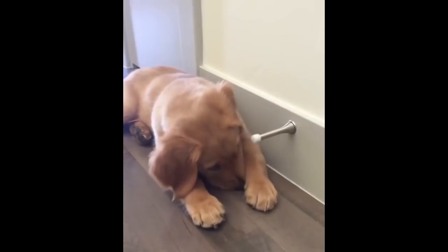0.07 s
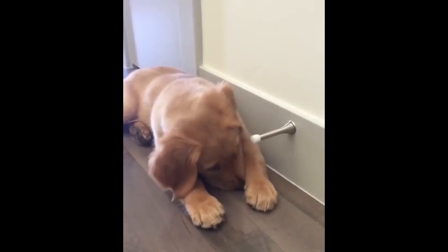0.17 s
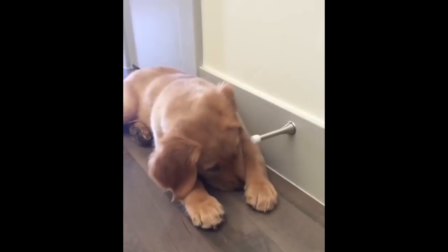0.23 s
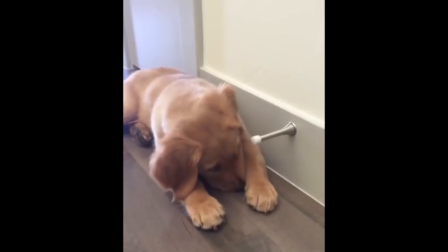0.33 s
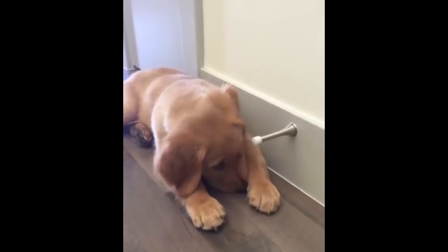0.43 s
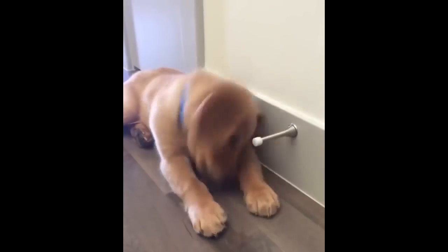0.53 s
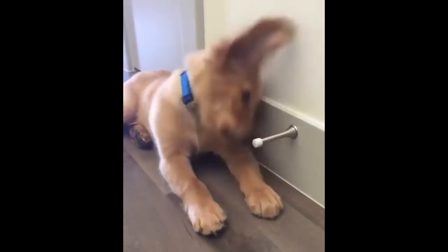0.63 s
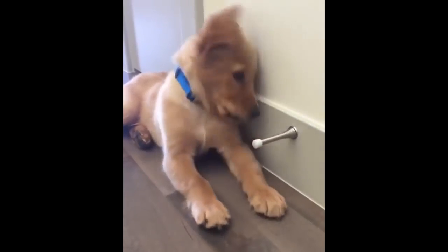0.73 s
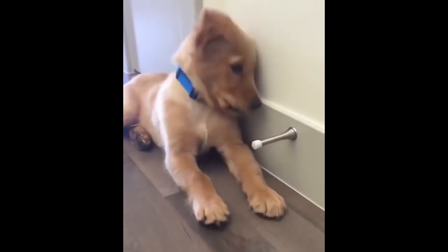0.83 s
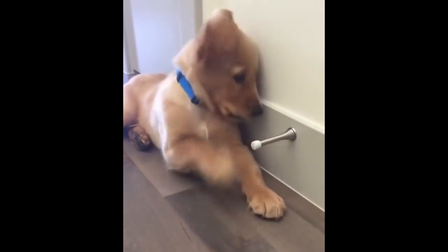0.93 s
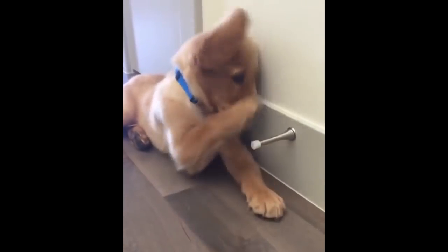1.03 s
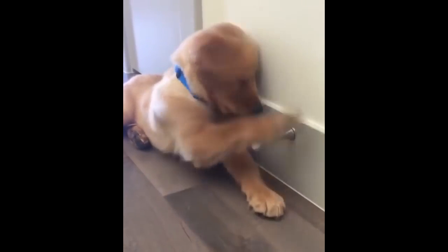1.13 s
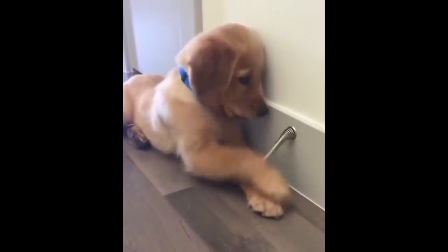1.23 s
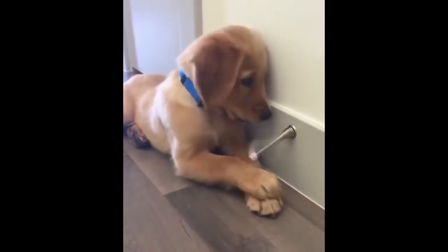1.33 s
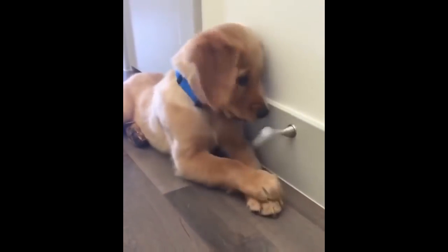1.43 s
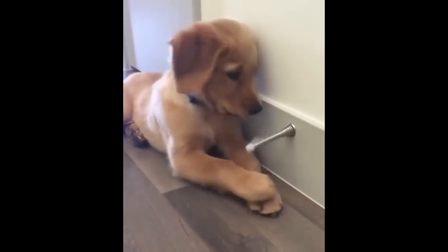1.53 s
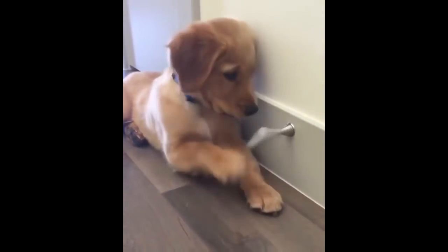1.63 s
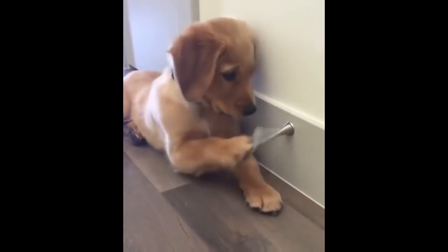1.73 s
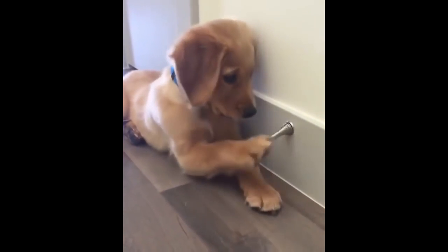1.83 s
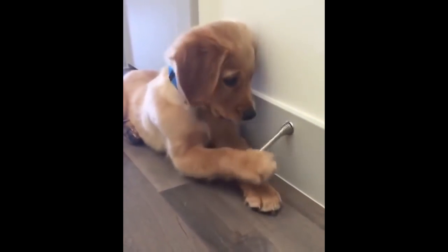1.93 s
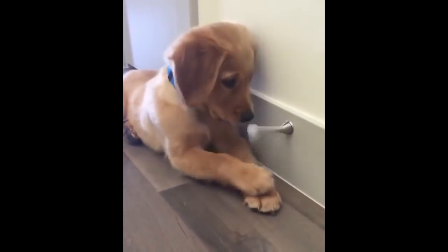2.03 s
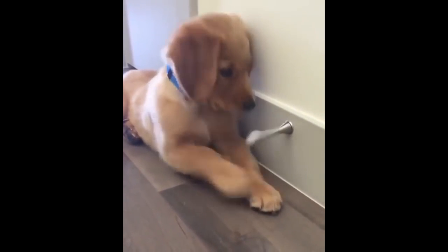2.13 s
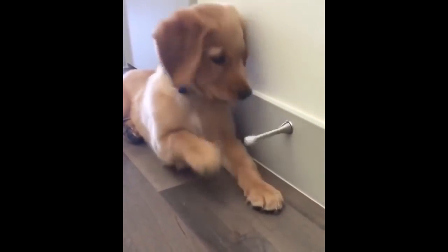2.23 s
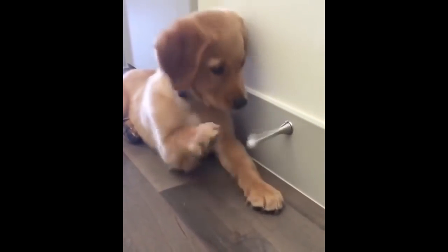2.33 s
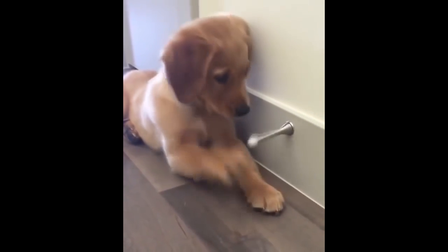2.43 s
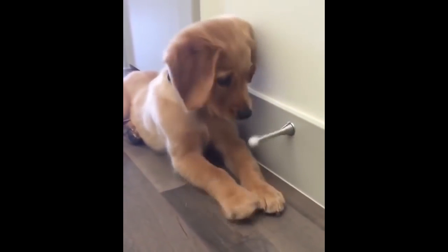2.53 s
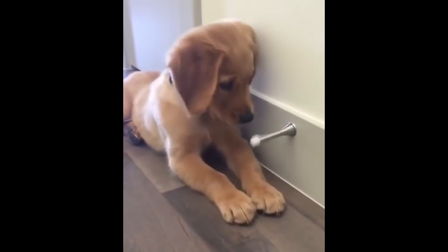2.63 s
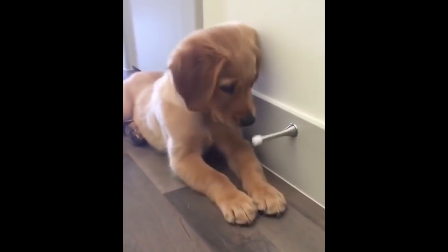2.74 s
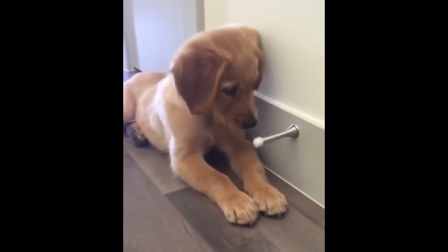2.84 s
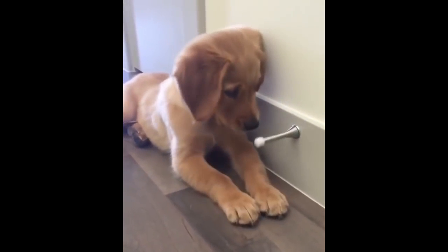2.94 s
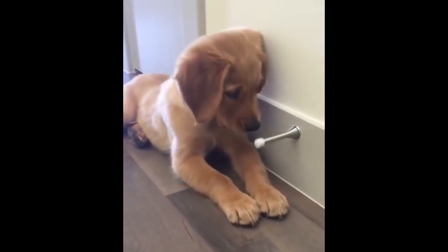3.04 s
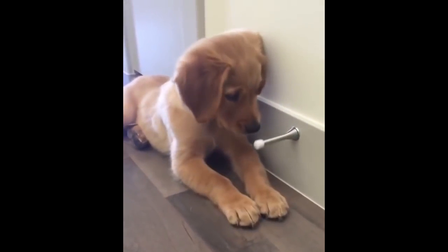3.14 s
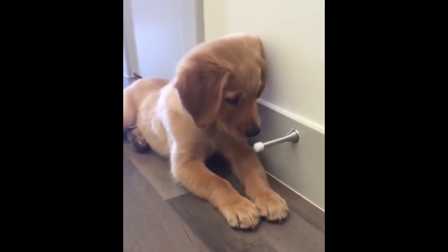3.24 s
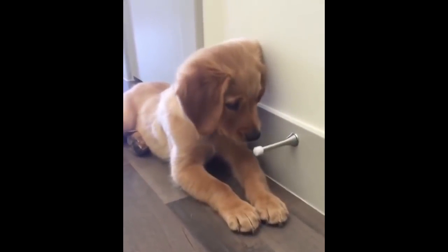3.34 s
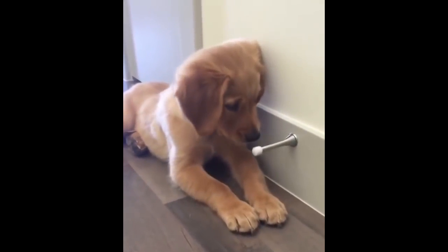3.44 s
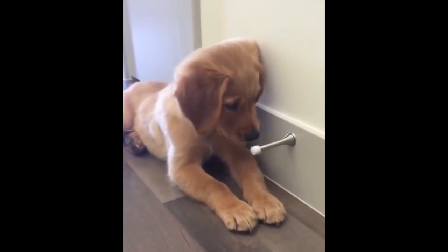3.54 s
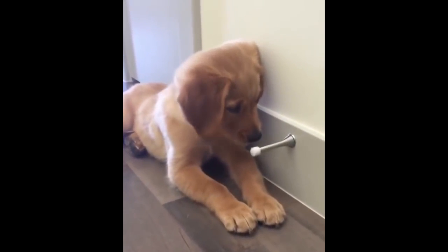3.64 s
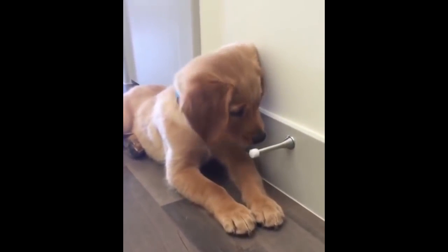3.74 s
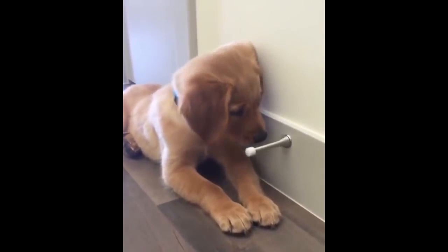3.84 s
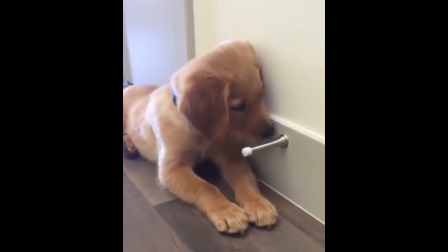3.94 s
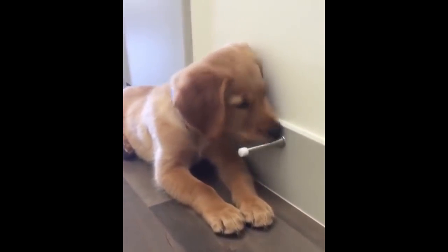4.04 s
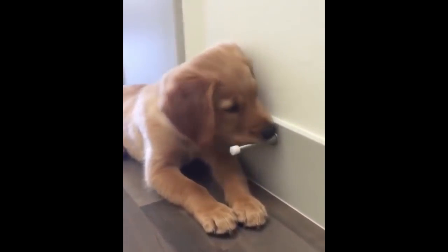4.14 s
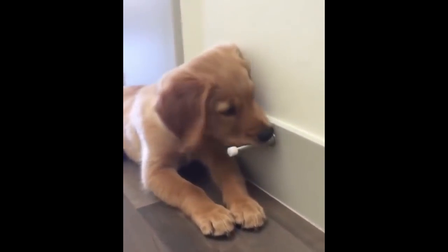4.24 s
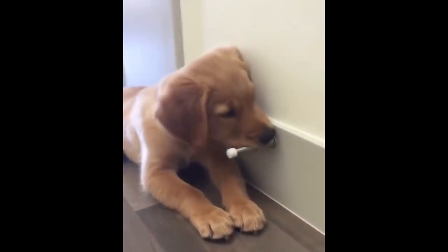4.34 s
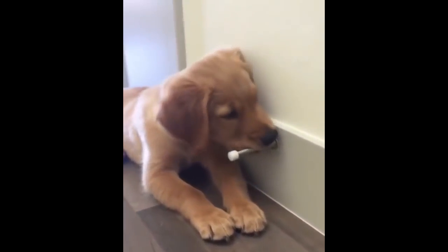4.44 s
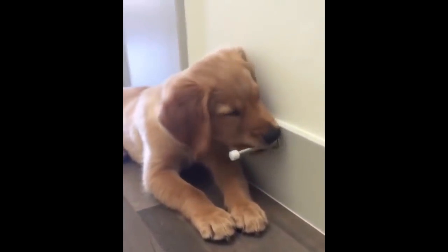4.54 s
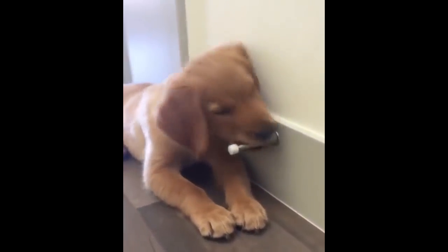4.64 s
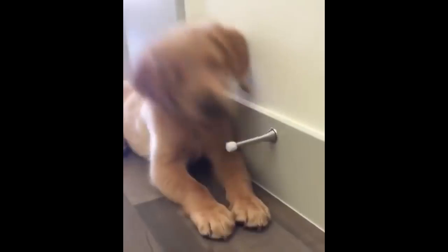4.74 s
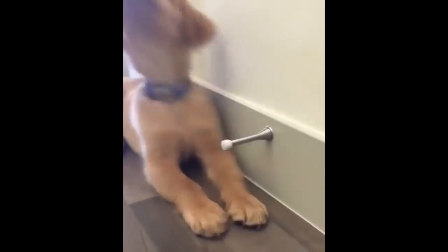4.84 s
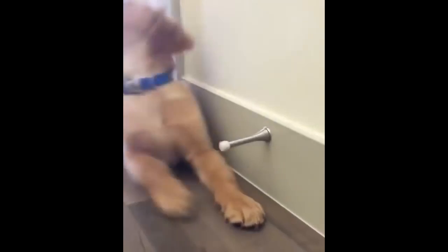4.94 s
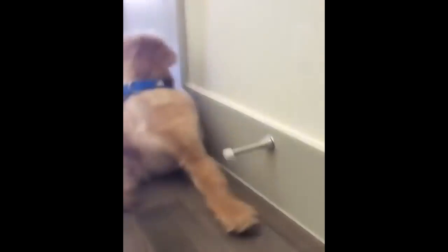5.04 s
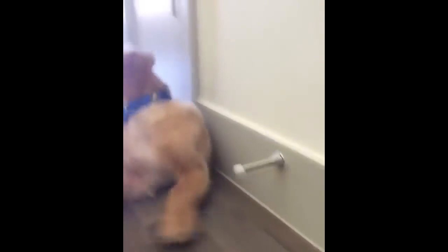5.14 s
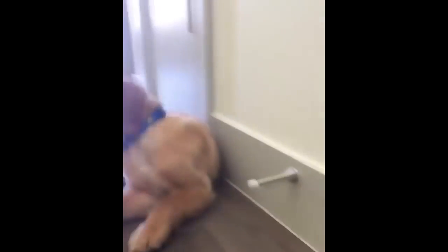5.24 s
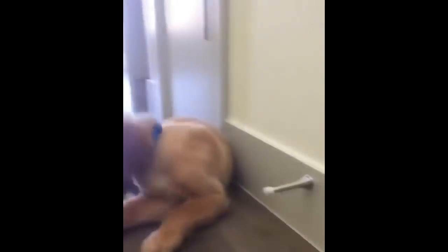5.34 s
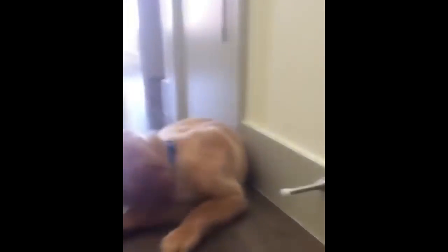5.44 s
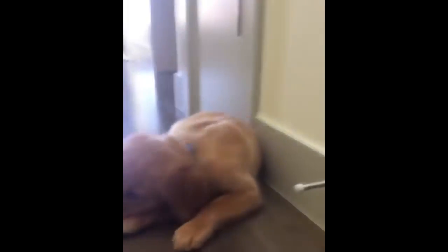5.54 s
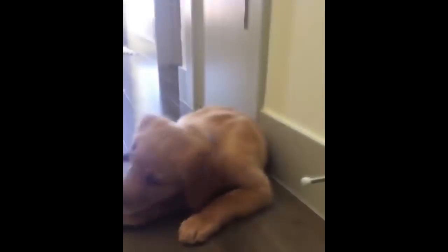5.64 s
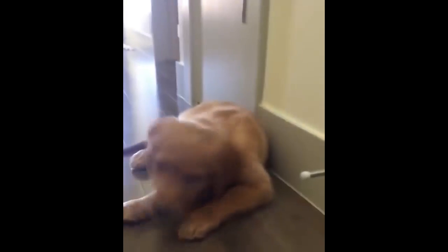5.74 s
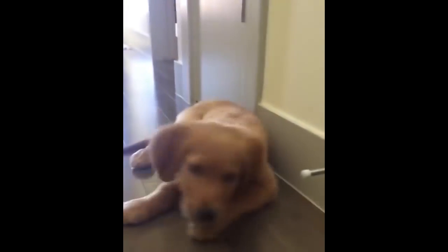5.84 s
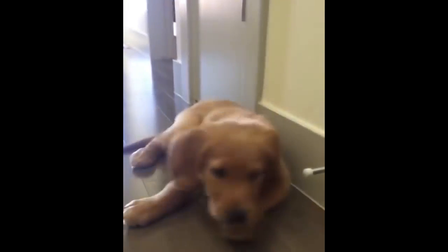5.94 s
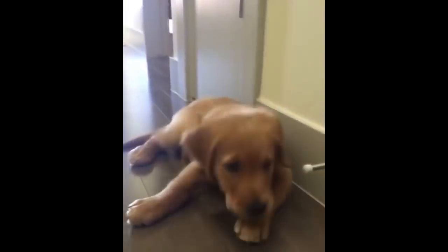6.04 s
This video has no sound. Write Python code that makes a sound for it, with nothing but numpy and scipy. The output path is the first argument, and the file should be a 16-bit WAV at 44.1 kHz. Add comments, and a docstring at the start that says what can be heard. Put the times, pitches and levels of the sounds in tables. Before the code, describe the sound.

A puppy flicks a metal coil door stopper, which rattles in two buzzing twangs and dies away in a quiet hallway.

```python
"""A coil-spring door stopper on a skirting board, pawed by a puppy close to a phone microphone.
Twice a swing the coils slap shut: a tick of steel, a clack running down the wire, a thump in the board.
The wire rings on between slaps. One twang dies away, two flicks follow, then the puppy noses it and
slides off, fur brushing the floor. The place is a bare, quiet hallway where an appliance hums."""
import sys
import numpy as np
from scipy import signal
from scipy.fft import rfft, irfft, next_fast_len
from scipy.io import wavfile

SR = 44100
rng = np.random.default_rng(int(sys.argv[2]) if len(sys.argv) > 2 else 0)


def put_to_file(sound):
    """Save the sound as 16-bit audio at rate SR, in the file named by the first command-line argument."""
    columns = np.atleast_2d(sound).T  # one column per channel
    safe = np.clip(columns, -1, 1)
    whole_steps = np.round(safe * 32767)
    wavfile.write(sys.argv[1], SR, whole_steps.astype(np.int16))


N = 267775

# One curve a twang; small swings run faster: time_s, swing_hz, share of a swing before the return slap
SWING_CURVES = [
    [(.0225, 24.7, .5), (.52, 25.1, .49)],
    [(1.472, 14.68, .49), (1.965, 16.11, .46)],
    [(2.1536, 16.27, .44), (2.3, 18.13, .52), (2.45, 17.88, .46), (2.6, 19.67, .41), (2.85, 22.8, .43),
     (3.15, 24.42, .46), (3.27, 24.1, .35), (4.16, 25, .4)],
]
# The same three twangs: force_db, flick_db (extra at first), hold_s, release_db_per_s,
# edge_db (metallic), crest_s (top of the throb), lean_s (furthest outward lean)
TWANG_FORCES = [(-35.5, 3, 0.2, 150, -51, 0.0082, 0.37), (-14.5, 5, .5, 30, 2, 1.533, 2.5),
                (-18, 1.5, 0.66, 33.5, -3, 2.135, 2.94)]
WIDE_DB, NARROW_DB = -16, -26  # a wide swing shuts the coils both ways; below narrow they barely meet
SWAY_DB = -49  # the last gentle sway still pushes on the board


def undb(db):
    """Decibels to gain."""
    return 10 ** (np.asarray(db) / 20)


def unit(x):
    """Scale to unit energy."""
    return x / np.sqrt(np.sum(x ** 2))


def through(x, response):
    """Play a signal through an impulse response."""
    return signal.fftconvolve(x, response)[:N]


def colour(points, size=4096):
    """Causal unit-energy response shaped by rows of frequency_hz, level_db."""
    hz, db = np.transpose(points)
    f = np.fft.rfftfreq(size, 1 / SR)
    gain = undb(np.interp(np.log(f + 1), np.log(hz), db))
    cepstrum = irfft(np.log(gain))
    cepstrum[1:size // 2] *= 2
    cepstrum[size // 2 + 1:] = 0
    return unit(irfft(np.exp(rfft(cepstrum))))


def fade(t60, seconds=2):
    """Exponential decay, 60 dB down after t60 seconds."""
    return np.exp(-np.log(1000) * np.arange(int(seconds * SR)) / SR / t60)


def swell(t, middle_s, half_s, db):
    """A smooth rise and fall."""
    return undb(db) * np.exp(-((t - middle_s) / half_s) ** 2 / 2)


def drift(points):
    """A random line through points spread evenly over the scene."""
    return np.interp(np.arange(N), np.linspace(0, N - 1, points), rng.standard_normal(points))


def blows(times, db):
    """One impulse a blow."""
    x = np.zeros(N)
    np.add.at(x, np.clip(times * SR, 0, N - 1).astype(int), undb(db))
    return x


def chatter(times, db, t60, rise_s):
    """Each blow is a short swell of tiny contacts, as when coil after coil closes."""
    t = np.arange(-SR // 200, SR // 50) / SR
    shape = unit(np.exp(np.where(t < 0, t / rise_s, -np.log(1000) * t / t60)))
    contacts = rng.standard_normal((len(times), len(t))) * shape * undb(db)[:, None]
    at = np.round(times[:, None] * SR) + np.round(t * SR)
    x = np.zeros(N)
    np.add.at(x, np.clip(at, 0, N - 1).astype(int), contacts)
    return x


def tail(t60, build_s):
    """A dense crowd of modes that builds up and dies away."""
    decay = fade(t60)
    build = 1 - np.exp(-np.arange(len(decay)) / SR / build_s)
    return unit(rng.standard_normal(len(decay)) * decay * build)


def ringing(modes, width=0):
    """Response of decaying modes; a relative width makes each a rough cluster of neighbouring coils."""
    t, out = np.arange(2 * SR) / SR, 0
    for hz, db, t60 in modes:
        beat = np.interp(t * hz * width, np.arange(2000), rng.standard_normal(2000)) if width else 1
        out += undb(db) * unit(beat * np.sin(2 * np.pi * hz * t) * fade(t60))
    return out


def room_tone(air_db=-56.5, waver_db=5.5):
    """An appliance hums, wavering, over the still air of the house."""
    # Spectrum of the air: frequency_hz, level_db
    air_spectrum = [(20, -31), (36, -24.5), (52, -2), (64, -5.5), (78, -11), (112, 0.5), (140, -11),
                    (200, -18), (320, -24), (1000, -32.5), (4000, -41.5), (13000, -53.5), (16000, -69)]
    # Tones of the appliance: pitch_hz, level_db
    hum_tones = [(53.8, -52.5), (107.7, -55), (215.3, -74.5), (339.1, -77.5)]
    t = np.arange(N) / SR
    out = undb(air_db) * through(rng.standard_normal(N), colour(air_spectrum))
    for hz, db in hum_tones:
        out += undb(db + waver_db * drift(40)) * np.sin(2 * np.pi * (hz * t + rng.random()))
    return out


def squeals(swing_hz=24.05, throb=0.69, bend_hz=8, wander_hz=85, ease_s=0.052):
    """In a small swing two coils rub: a thin, rough note that swells and bends once a swing."""
    # Spells of rubbing: start_s, end_s, pitch_hz, level_db
    rubs = [(-.04, 0.24, 3140, -66), (-.04, 0.293, 1520, -66.5), (3.126, 3.558, 3583, -60.5)]
    t, out = np.arange(N) / SR, 0
    for start, end, hz, db in rubs:
        swing = np.cos(2 * np.pi * swing_hz * (t - start))
        gate = np.clip(np.minimum(t - start, end - t) / ease_s, 0, 1)
        phase = 2 * np.pi * np.cumsum(hz + bend_hz * swing + wander_hz * drift(2000)) / SR
        out += undb(db) * gate * (1 + throb * swing) * np.sin(phase)
    return out


def jangle(times, db, t60=0.62, full_db=-14, still_ringing_db=-30.5):
    """Loose coils keep jostling after each slap, so the ring never repeats; it dulls as slaps weaken."""
    # The wire's bright ring after hard slaps: frequency_hz, level_db
    bright_spectrum = [(40, -48), (300, -22.5), (700, -4.5), (1300, 2), (2200, 4.5), (3100, -2.5),
                       (3500, -9.5), (6000, -17.5), (9500, -18.5), (13700, -36.5), (15000, -61.5)]
    # The duller ring that every swing leaves: frequency_hz, level_db
    dull_spectrum = [(35, -38.5), (120, -17), (170, 4.5), (380, -5.5), (480, -2), (640, 3), (820, 0),
                     (1100, -1), (1700, -14.5), (2500, -22), (6000, -44)]
    times, db = np.r_[0, times], np.r_[still_ringing_db, db]  # still ringing from an earlier flick
    bright_db = full_db + 10.5 + 1.25 * (db - full_db)
    dull_db = full_db + 9.5 + 0.47 * (db - full_db)
    out = 0
    for spectrum, level_db in [(bright_spectrum, bright_db), (dull_spectrum, dull_db)]:
        power = through(blows(times, 2 * level_db), unit(fade(t60)) ** 2)
        out += through(np.sqrt(np.abs(power)) * rng.standard_normal(N), colour(spectrum))
    return out


def slap_times(swing):
    """Times and sides (+1 outward, -1 return): the coils close at both ends of a swing."""
    s, hz, share = np.transpose(swing)
    t = np.arange(s[0], s[-1], 1 / SR)
    turns = np.cumsum(np.interp(t, s, hz)) / SR
    outward = np.arange(np.ceil(turns[-1]))
    back = outward + np.interp(np.interp(outward, turns, t), s, share)
    back = back[back < turns[-1]]
    sides = np.r_[np.ones(len(outward)), -np.ones(len(back))]
    return np.interp(np.r_[outward, back], turns, t), sides


def swing_force(times, start, twang, flick_s=0.032, throb_hz=6, throb_db=1.2):
    """Force of a twang in dB: flick, hold, steady release; it throbs as two bending planes beat."""
    db, flick_db, hold_s, release_db_per_s, _, crest_s, _ = twang
    age = times - start
    flick = flick_db * np.exp(-(age / flick_s) ** 2)
    release = release_db_per_s * np.maximum(age - hold_s, 0)
    return db + flick - release + throb_db * np.cos(2 * np.pi * throb_hz * (times - crest_s))


def slaps(lean_period_s=0.72, scatter_db=0.53):
    """Rows of hard slaps and, between them, lighter ones that follow the force of the swing."""
    # Slaps that stand out of the rattle: time_s, thump_db, clack_db, tick_db
    hard_slaps = [(1.472, -8, -12, -16.5), (1.503, -23, -19, -20.5), (1.5056, -7, -10, -21.5),
                  (1.539, -7.5, -5, -9.5), (1.572, -15.5, -14, -22.5), (1.6041, -11.5, -11.5, -15),
                  (1.638, -12.5, -13.5, -18.5), (1.671, -19, -17.5, -22), (1.7029, -13, -9.5, -21),
                  (1.737, -18, -18.5, -22), (1.7681, -15.5, -10, -16.5), (1.801, -17, -18, -20),
                  (1.8314, -14, -12, -16.5), (1.865, -17, -19, -22), (1.894, -14, -12, -23),
                  (1.929, -15.5, -15, -23), (1.9565, -10.5, -9.5, -23), (2.1534, -6, -5.5, -18),
                  (2.18, -6.5, -8, -13.5), (2.2362, -26.5, -20, -18), (2.241, -13, -15, -20),
                  (2.2951, -14.5, -29, -24.5), (2.3264, -16.5, -15, -25.5), (2.354, -16, -20.5, -29),
                  (2.3803, -17, -11.5, -24), (2.411, -20, -15.5, -24), (2.464, -15, -16.5, -28),
                  (2.5151, -16, -16.5, -29), (2.5462, -13, -16.5, -18.5), (2.5677, -10, -12.5, -24),
                  (2.597, -18, -12.5, -22), (2.618, -15, -42, -29), (2.6463, -21.5, -19, -21),
                  (2.718, -23.5, -20, -28.5), (2.744, -17.5, -24.5, -24), (2.7641, -15.5, -17, -37),
                  (2.7897, -14, -17, -20), (2.809, -14.5, -19.5, -34), (2.8346, -17, -18.5, -22.5),
                  (2.9216, -16.5, -21, -28), (3.0486, -18.5, -24, -27.5), (3.0902, -18.5, -23.5, -29.5),
                  (3.1317, -22.5, -27, -38), (3.2669, -23.5, -34, -65), (3.475, -29, -42.5, -57),
                  (3.515, -26.5, -46, -55)]
    # One loose coil ticks on the outward swing: middle_s, half_length_s, level_db
    loose_coil = (3.68, 0.073, -50.5)
    hard = np.array(hard_slaps)
    rows = [hard]
    for swing, twang in zip(SWING_CURVES, TWANG_FORCES):
        times, side = slap_times(swing)
        edge_db, lean_s = twang[4], twang[6]
        force = swing_force(times, times[0], twang)
        # The swing favours each side in turn, more so as it shrinks.
        depth_db = 1.5 + 0.19 * np.maximum(WIDE_DB - force, 0)
        lean = depth_db * side * np.cos(2 * np.pi * (times - lean_s) / lean_period_s)
        narrow = np.maximum(NARROW_DB - force, 0)  # clack and tick fade faster in a narrow swing
        force = force + lean + scatter_db * rng.standard_normal(len(times))
        thump = np.maximum(force, SWAY_DB)
        clack = force + edge_db - 2 - 1.9 * narrow
        tick = force + edge_db - 8.5 - 1.4 * narrow + 0.61 * lean
        tick = 20 * np.log10(undb(tick) + (side > 0) * swell(times, *loose_coil))
        clear_of_hard = np.abs(times[:, None] - hard[:, 0]).min(axis=1) > 0.011
        rows.append(np.c_[times, thump, clack, tick][clear_of_hard])
    return np.vstack(rows)


def board(times, db, echo, echo_s=0.003247, scatter=0.059):
    """Each push is followed by its reflection, earlier or later according to which coils met."""
    lag = echo_s * (1 + scatter * rng.standard_normal(len(times)))
    return (blows(times, db) + echo * blows(times + lag, db)) / np.hypot(1, echo)


def thumps(times, db, hard_db=-27, knee_db=2.5):
    """Hard slaps knock on the skirting board; gentle ones push for longer and only make it hum."""
    # The board under a knock: frequency_hz, level_db
    knock_spectrum = [(40, -50), (130, -9), (220, -2), (350, 5.5), (450, 1), (620, -6), (900, -18),
                      (2000, -52.5), (6000, -86.5)]
    # The board under a gentle push: frequency_hz, level_db
    push_spectrum = [(60, -30.5), (140, -10.5), (200, 5.5), (270, 10), (350, -1), (400, -3), (480, -18.5),
                     (700, -29.5), (1500, -45.5), (4000, -79)]
    hardness = 1 / (1 + np.exp((hard_db - db) / knee_db))
    knock_db = db + 10 * np.log10(hardness)
    push_db = db + 10 * np.log10(1 - hardness + 1e-9)
    knock = board(times, knock_db, echo=0.85) + chatter(times, knock_db - 10, t60=0.085, rise_s=0.00065)
    push = blows(times, push_db - 3) + chatter(times, push_db - 12, t60=0.09, rise_s=0.0033)
    return through(knock, colour(knock_spectrum)) + through(push, colour(push_spectrum))


def clacks(times, db, softening=0.23, full_db=-12):
    """The coils clack shut one after another; weak slaps lose their edge."""
    # The clack in the wire: frequency_hz, level_db
    clack_spectrum = [(35, -56), (150, -35.5), (450, -12.5), (700, -5), (1100, 7), (2200, -2), (2900, -11),
                      (3700, -12), (6000, -25), (13700, -52.5), (15000, -71)]
    db = db + softening * np.minimum(db - full_db, 0)
    contacts = board(times, db + 16.5, echo=0.83) + chatter(times, db + 13, t60=0.054, rise_s=0.001)
    return through(contacts, colour(clack_spectrum))


def disperse(x, lag_s):
    """Bending waves travel faster when higher, so each slap falls in pitch; lag_s holds at 1 kHz."""
    size = next_fast_len(N + SR)
    f = np.fft.rfftfreq(size, 1 / SR)
    delay = lag_s * np.sqrt(1000 / np.maximum(f, 200))
    phase = 2 * np.pi * np.cumsum(delay) * f[1]
    return irfft(rfft(x, size) * np.exp(-1j * phase), size)[:N]


def pings(times, db, low_hz, high_hz, t60, count):
    """Each slap is between different coils, so it rings a few notes of its own."""
    x, decay = np.zeros(N + SR), fade(t60, seconds=t60)
    t = np.arange(len(decay)) / SR
    notes = rng.uniform(low_hz, high_hz, (len(times), count))
    for s, size, hz in zip(times, undb(db), notes):
        i = int(s * SR)
        chord = np.sin(2 * np.pi * hz[:, None] * t).sum(axis=0)
        x[i:i + len(t)] += size * unit(decay * chord)
    return x[:N]


def ticks(times, db, stutter_s=0.002, uneven_db=4):
    """Steel scrapes on steel, snaps shut and pings, neighbouring coils a moment apart."""
    # Steel meeting steel: frequency_hz, level_db
    tick_spectrum = [(40, -55.5), (800, -23.5), (2500, -8.5), (4200, 2.5), (6000, 3), (7500, -3.5),
                     (9000, 2), (10600, -6.5), (13700, -4.5), (14300, -24), (16000, -37)]
    snap = chatter(times, db, t60=0.013, rise_s=0.00061)
    scrape = chatter(times, db - 6, t60=0.086, rise_s=0.0027)
    steel = snap + scrape + pings(times, db - 6, low_hz=5530, high_hz=13640, t60=0.015, count=3)
    for lag, size in rng.standard_normal((len(times), 2, 2)).transpose(1, 2, 0):  # two neighbours
        neighbour_times = times + stutter_s * (1 + lag)
        steel += chatter(neighbour_times, db - 8 + uneven_db * size, t60=0.0043, rise_s=0.00015)
    return through(steel, colour(tick_spectrum))


def wire_wash(clack, thump):
    """Clacks and thumps ring on in the wire's dense crowd of modes."""
    # Spectrum of that ring: frequency_hz, level_db
    wire_spectrum = [(100, -13), (200, -4.5), (600, -5), (1200, -6), (2200, -16.5), (3200, -1), (4500, -1),
                     (14000, -26)]
    wire = colour(wire_spectrum)
    wash = through(undb(-10) * clack + undb(-16) * thump, tail(t60=0.98, build_s=0.0026))
    return through(wash, wire / np.abs(rfft(wire)).max())


def wire_ring(times, db, t60=0.32):
    """Every slap wakes the same resonances, each by an amount that depends on where the coils met."""
    # Resonances of the wire and the board that holds it: pitch_hz, level_db
    wire_modes = [(538, -1.0), (604, -0.5), (639, 0.5), (875, -1), (1051, -1.5), (1164, -2.5), (1400, -3),
                  (1432, -0.5), (1816, -3), (1844, -3), (2028, -7), (2167, -7.5), (2203, -11.5), (2264, -9),
                  (2447, -9), (2525, -10.5), (2674, -13), (2838, -12.0), (3021, -12.5), (3085, -13),
                  (3130, -14.5), (3155, -14)]
    shares, out = rng.standard_normal((len(times), len(wire_modes))), 0
    at = np.clip(times * SR, 0, N - 1).astype(int)
    radius = np.exp(-np.log(1000) / (SR * t60))
    for (hz, mode_db), share in zip(wire_modes, shares.T):
        push = np.bincount(at, share * undb(db + mode_db), N)
        pole = radius * np.exp(2j * np.pi * hz / SR)
        out += signal.lfilter([1], [1, -pole], push).imag
    return np.sqrt(2 * (1 - radius ** 2)) * out


def stopper():
    """Each slap or touch ticks, clacks and thumps; the wire keeps ringing."""
    # Paw and nose touch the stopper: time_s, thump_db, clack_db, tick_db
    touches = [(1.3318, -25.5, -27, -27.5), (1.425, -33.5, -77, -82), (4.265, -39, -41.5, -52.5),
               (4.277, -43, -34, -49.5), (4.347, -41.5, -54, -92), (4.378, -50, -68, -80),
               (4.455, -35.5, -72, -81.5), (4.487, -42, -80, -73), (4.813, -34.5, -52, -56.5)]
    # Long-ringing low modes of the spring: pitch_hz, level_db, t60_s
    low_modes = [(97.75, -10, 2.1), (155.2, -12.5, 0.69), (180.6, -12, 1), (196.5, -8, 1.0),
                 (254.6, -9, 0.22), (292.7, -10.5, 0.78), (342, -10, 0.47), (369.4, -5.5, 0.64)]
    free = slaps()
    slap_s, _, slap_db, _ = free.T
    times, thump_db, clack_db, tick_db = np.vstack([free, touches]).T
    thump = undb(20) * thumps(times, thump_db)
    clack = clacks(times, clack_db)
    ring = wire_wash(clack, thump) + jangle(slap_s, slap_db)
    ring += pings(slap_s, slap_db + 9.5, low_hz=845, high_hz=2933, t60=0.05, count=4)
    ring += through(blows(times, thump_db + 12), ringing(low_modes))
    ring += wire_ring(slap_s, slap_db + 4)
    ring += bent_spring(touches)
    return ticks(times, tick_db + 13.5) + disperse(thump + clack, lag_s=0.00039) + ring


def wobble(harmonic=13, bend_hz=60, throb=0.7, lag_turns=0.1, ease_s=0.024, stop_s=0.29):
    """The bent spring hums on a multiple of its swing rate, rising and swelling once a turn."""
    t, out = np.arange(N) / SR, 0
    for swing, twang in zip(SWING_CURVES, TWANG_FORCES):
        s, hz, _ = np.transpose(swing)
        rate = np.interp(t, s, hz)
        angle = 2 * np.pi * (np.cumsum(rate * (t > s[0])) / SR - lag_turns)
        force = np.maximum(swing_force(t, s[0], twang), SWAY_DB)
        gate = np.clip(np.minimum((t - s[0]) / ease_s, (s[-1] - t) / stop_s), 0, 1)
        note = np.sin(harmonic * angle + bend_hz / rate * np.sin(angle))
        db = -36 - 0.7 * np.abs(force - NARROW_DB)  # strongest when the coils just meet
        out += undb(db) * gate * (1 + throb * np.cos(angle)) * note
    return out


def fur(rustle_db=-83, grain_db=2):
    """Fur slides over floor and board in uneven brushes; the coat is never quite still."""
    # Brushes of the coat: middle_s, half_length_s, level_db
    brushes = [(0.686, 0.028, -63), (0.824, 0.06, -66.5), (1.03, .025, -71.5), (4.252, 0.037, -65),
               (5.06, 0.073, -66.5), (5.16, 0.044, -57.5), (5.256, 0.039, -61), (5.359, 0.023, -65),
               (5.43, 0.064, -71.5), (5.702, 0.016, -69.5), (6.062, 0.043, -62)]
    # Hiss of sliding fur: frequency_hz, level_db
    fur_spectrum = [(200, -9.5), (900, -6), (2000, -0.5), (3800, 0.5), (6000, -3), (10000, -4.5),
                    (13600, -10), (14500, -29.5)]
    t = np.arange(N) / SR
    rubbing = np.sqrt(undb(rustle_db) ** 2 + sum(swell(t, *brush) ** 2 for brush in brushes))
    grain = undb(grain_db * drift(N // 300))
    return rubbing * grain * through(rng.standard_normal(N), colour(fur_spectrum))


def bent_spring(touches, sharp_db=-30):
    """Held bent by a paw or nose, the spring rings in other modes; only a sharp touch makes it zing."""
    # Modes of the bent spring: pitch_hz, level_db, t60_s
    bent_modes = [(346, 3, 0.059), (370, -5.5, 0.5), (555, -4, 0.6), (937, -8, 0.35), (1210, -7.5, 0.65),
                  (1550, -6.5, 0.5), (1842, -11.5, .45)]
    # High zing of the bent wire: pitch_hz, level_db, t60_s
    zing_modes = [(2532, -12.5, 0.35), (3690, -12, 0.65), (4040, -10, 0.61), (4070, -4, .025),
                  (5250, -10, 0.64), (5380, -2.5, 0.03), (7500, -16, .4)]
    # Low ring and hollow knock of the held spring: pitch_hz, level_db, t60_s
    body_modes = [(293.6, -15.5, 0.45), (325, -7.5, 0.18)]
    times, thump_db, clack_db, tick_db = np.transpose(touches)
    zing_db = tick_db - np.maximum(sharp_db - tick_db, 0)
    ring = through(blows(times, clack_db + 14), ringing(bent_modes, width=0.13))
    zing = through(blows(times, zing_db + 14), ringing(zing_modes, width=0.13))
    body = through(blows(times, thump_db + 26), ringing(body_modes))
    return ring + zing + body


def paws(hz=125):
    """Soft pads thud on the floor."""
    # Paws landing: time_s, level_db
    steps = [(1.558, -26), (2.234, -29), (2.697, -20), (4.526, -39.5), (5.009, -41.5)]
    times, db = np.transpose(steps)
    pad = colour([(30, -40), (hz / 2, -15), (hz, 0), (2 * hz, -10), (700, -40), (4000, -80)])
    return through(chatter(times, db + 24, t60=0.11, rise_s=0.0066), pad)


def claw(hz=3850):
    """A claw drags on the floor: a brief scrape in one narrow resonance."""
    # The drag: middle_s, half_length_s, level_db
    drag = (5.13, 0.022, -61)
    band = colour([(hz / 2, -30), (hz * 0.9, -14), (hz, 0), (hz * 1.1, -14), (hz * 2, -30)])
    return swell(np.arange(N) / SR, *drag) * through(rng.standard_normal(N), band)


def scene(room_db=-10, room_t60=0.9, room_top_hz=7000):
    """Stopper and puppy close to the microphone, in a bare hallway with a slightly duller echo."""
    near = stopper() + wobble() + squeals() + paws() + undb(-2) * fur() + claw()
    walls = signal.lfilter(*signal.butter(1, room_top_hz, fs=SR), tail(room_t60, build_s=0.015))
    return (near + undb(room_db) * through(near, walls) + room_tone())[None]


def record(dry, bass_hz=42, ceiling=1.15, top_hz=16400):
    """The phone's mono microphone thins the deepest bass, rounds the loudest peaks and cuts the top."""
    thinned = signal.sosfilt(signal.butter(4, bass_hz, "high", fs=SR, output="sos"), dry)
    rounded = ceiling * np.tanh(thinned / ceiling)
    return signal.sosfilt(signal.ellip(8, 0.2, 70, top_hz, fs=SR, output="sos"), rounded)


dry = scene()
out = record(dry)
put_to_file(out)
```